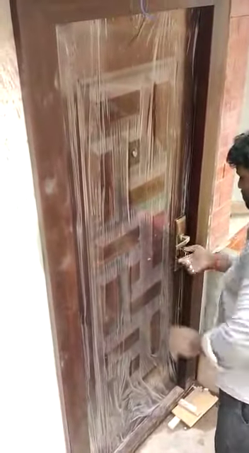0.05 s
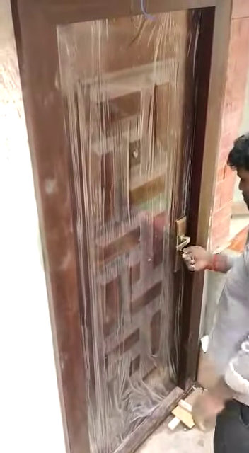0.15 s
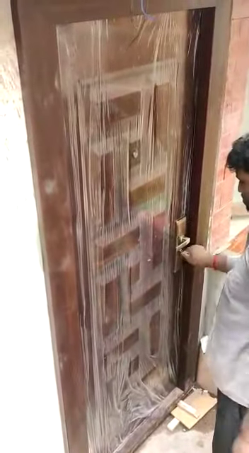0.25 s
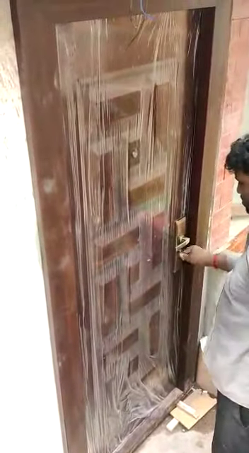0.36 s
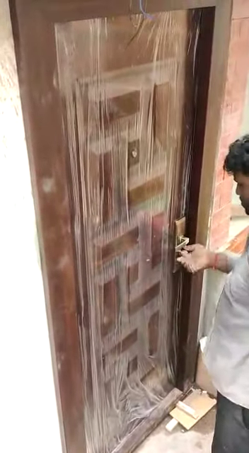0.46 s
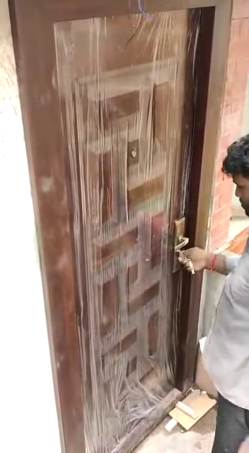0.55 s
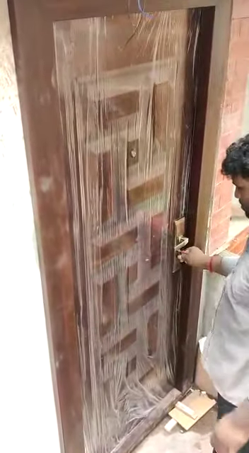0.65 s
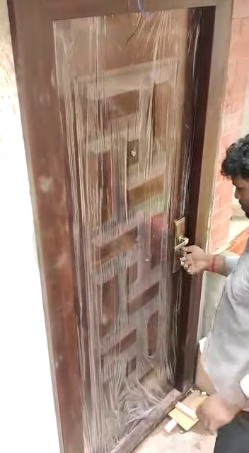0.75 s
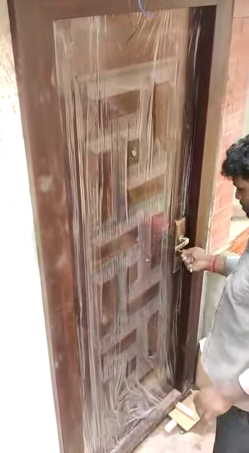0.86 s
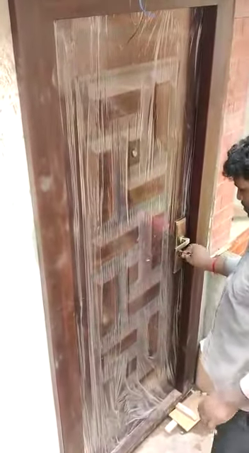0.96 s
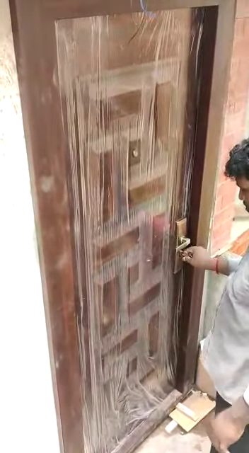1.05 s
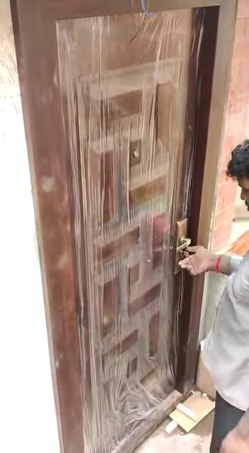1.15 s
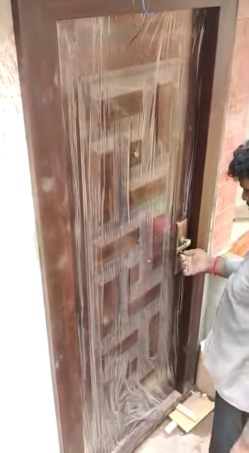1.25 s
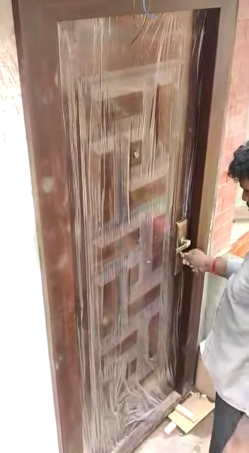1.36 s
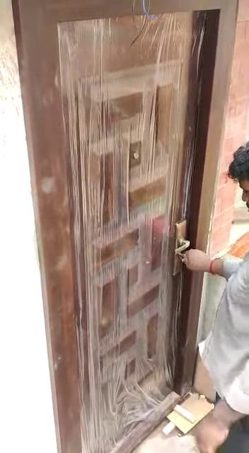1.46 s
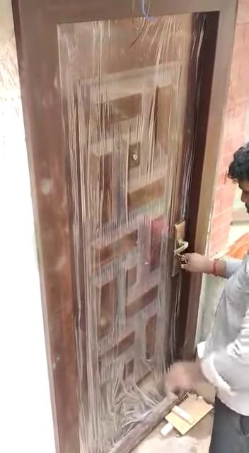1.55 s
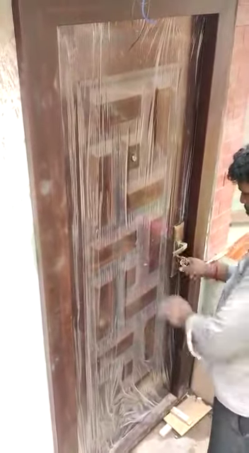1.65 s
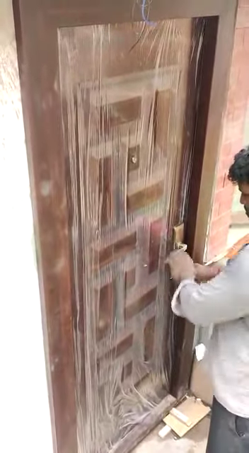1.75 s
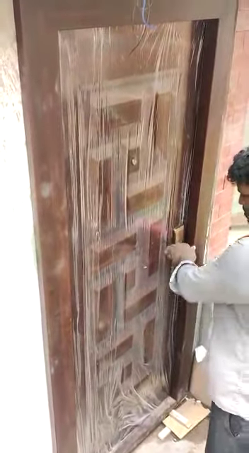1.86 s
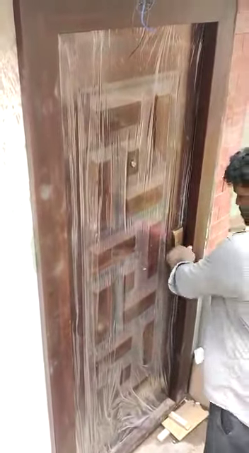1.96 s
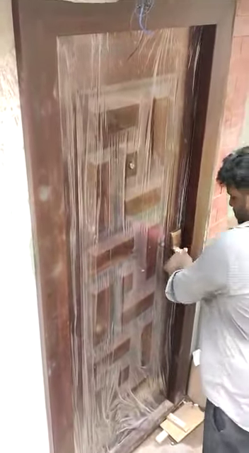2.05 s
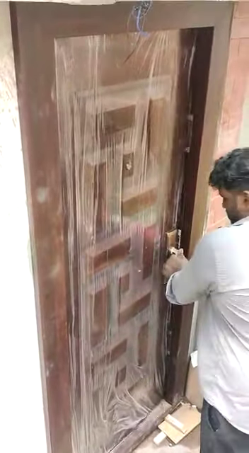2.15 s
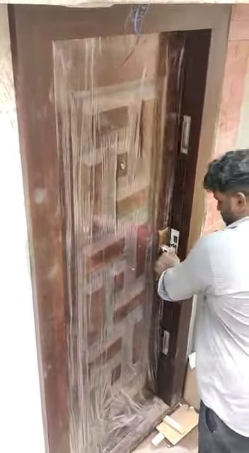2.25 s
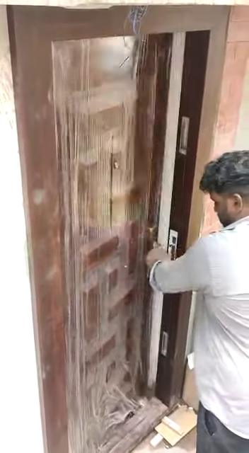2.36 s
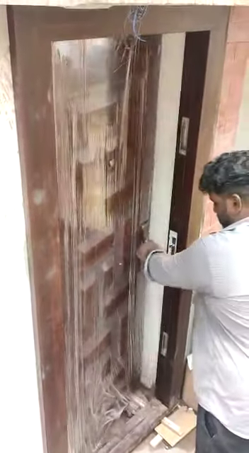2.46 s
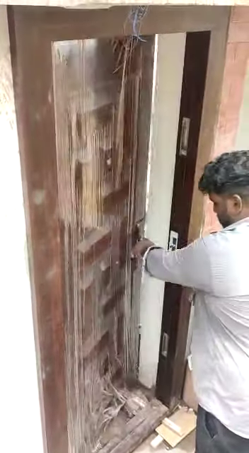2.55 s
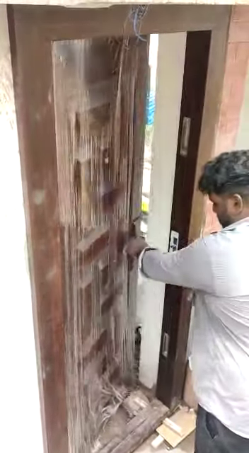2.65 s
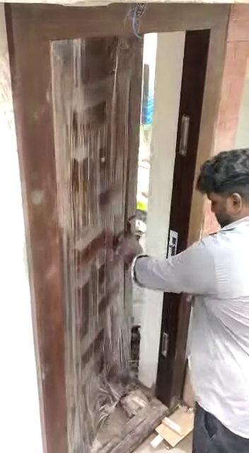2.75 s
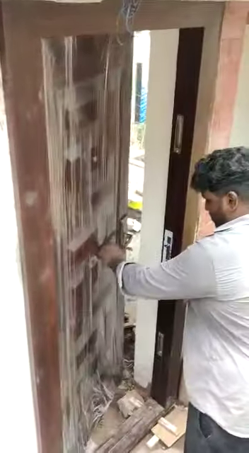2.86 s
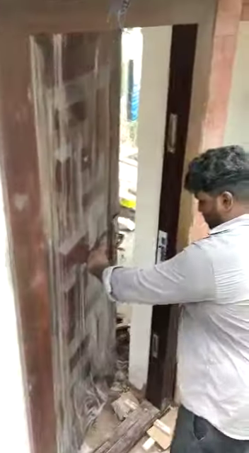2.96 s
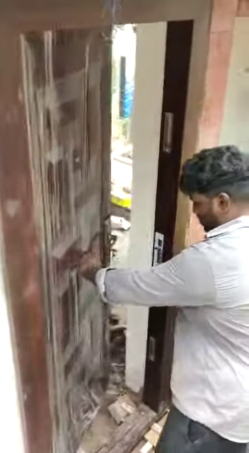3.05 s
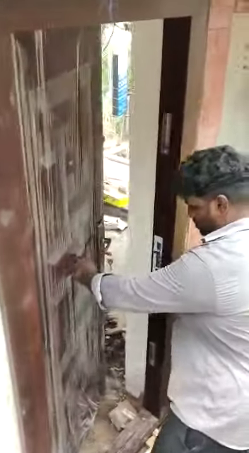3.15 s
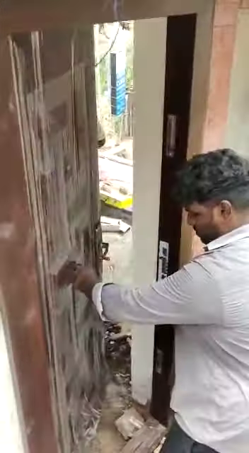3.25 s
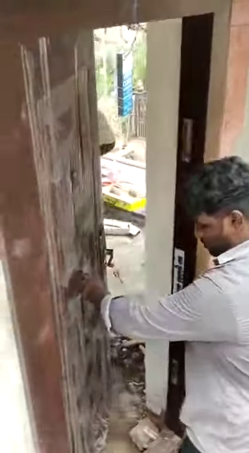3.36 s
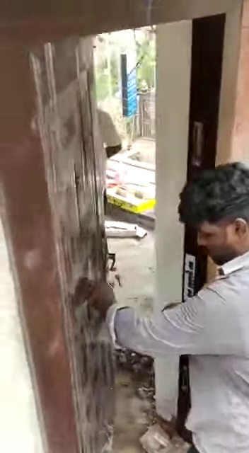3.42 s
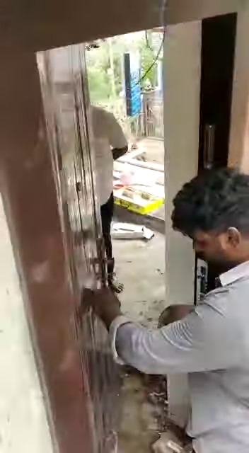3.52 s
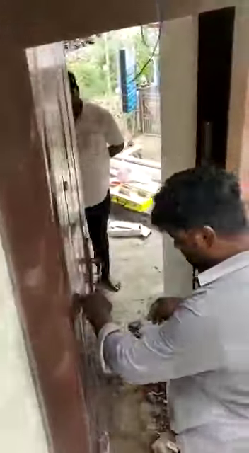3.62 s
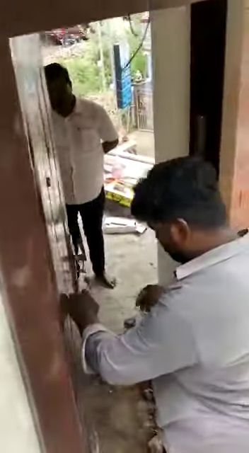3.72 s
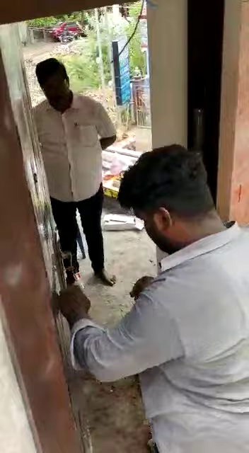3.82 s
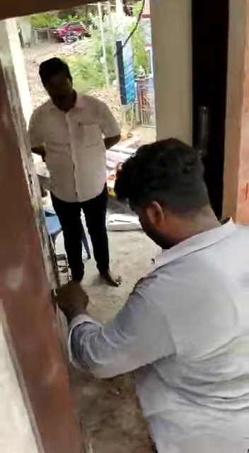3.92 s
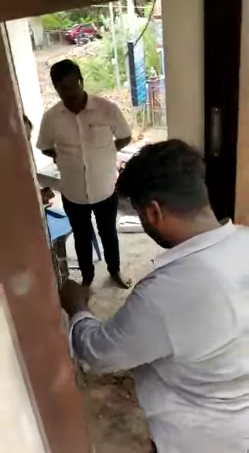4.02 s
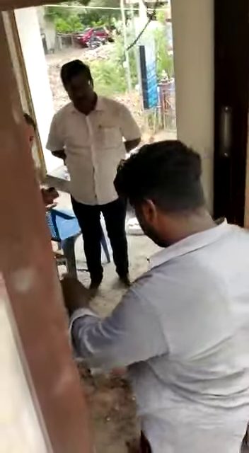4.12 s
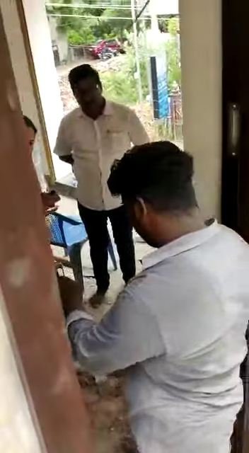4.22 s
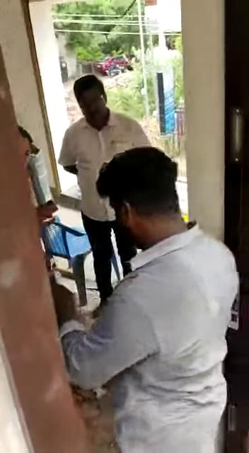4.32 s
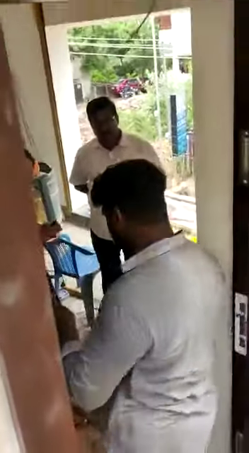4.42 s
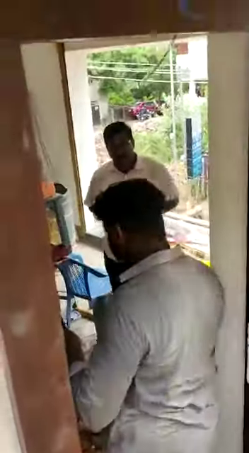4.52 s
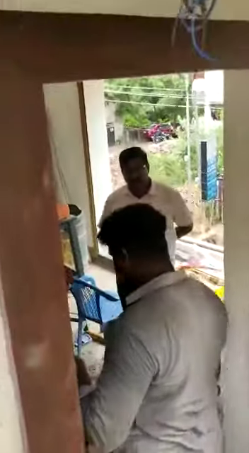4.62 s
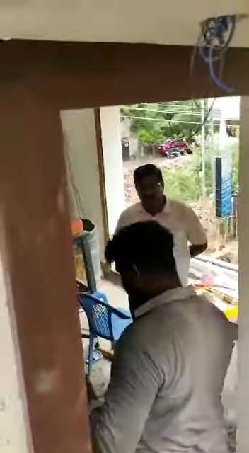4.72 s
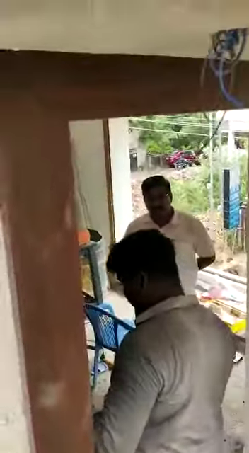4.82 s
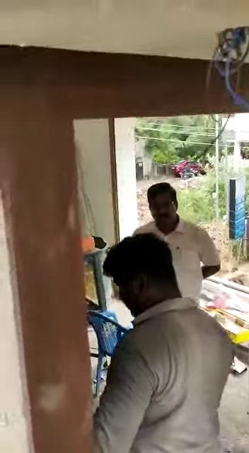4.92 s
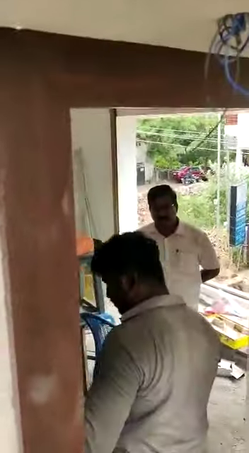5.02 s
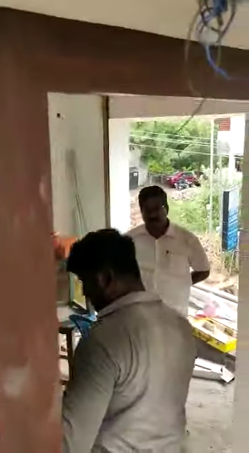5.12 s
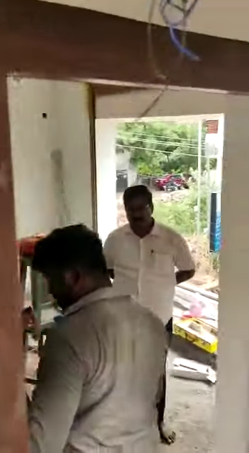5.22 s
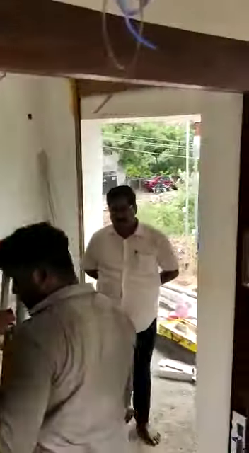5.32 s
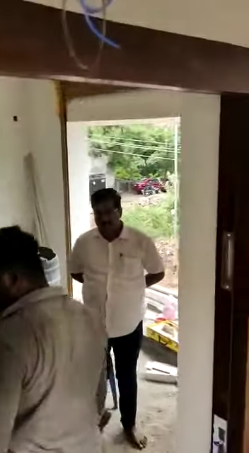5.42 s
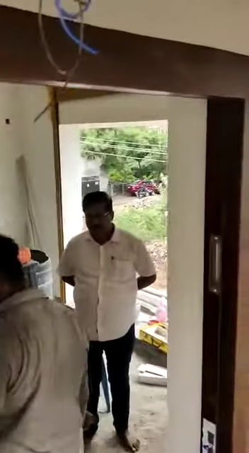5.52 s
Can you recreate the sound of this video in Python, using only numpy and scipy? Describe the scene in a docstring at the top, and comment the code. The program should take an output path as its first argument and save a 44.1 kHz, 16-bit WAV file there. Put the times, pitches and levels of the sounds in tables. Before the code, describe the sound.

Sharp metallic lock clatters over a low outdoor rumble, then a latch click and sudden loud grinder noise with a growing motor hum.

```python
"""A steel door unlocked onto a grinding wheel

A key throws the bolts of a hollow steel door twice, the handle draws the latch and the leaf swings open:
contacts excite decaying noise and the modes of door skin, lock and latch, and bare walls prolong the noise.
Beyond it a motor turns a grinding wheel; strokes of work give a loud rush of shaped noise, ringing steel
modes, sine whines and a hum of multiples that grows as the doorway clears, over a low outdoor rumble."""
import sys
import numpy as np
from scipy import signal
from scipy.io import wavfile

SR = 44100
rng = np.random.default_rng(int(sys.argv[2]) if len(sys.argv) > 2 else 0)


def int16_out(signal):
    """Quantize to a 16-bit WAV file."""
    q = np.round(np.clip(np.atleast_2d(signal).T, -1, 1) * 32767)
    wavfile.write(sys.argv[1], SR, q.astype(np.int16))


N = 246078   # length [samples]

# pressure of the work on the wheel, as level of the rush: (time [s], level [dB])
PRESSURE = [(2.24, -60), (2.282, -45), (2.292, -34.5), (2.39, -28), (2.53, -27), (2.6, -28.5),
            (2.73, -32.5), (2.85, -24), (3.08, -29), (3.19, -23), (3.31, -30), (3.41, -24), (3.64, -32),
            (3.77, -22.5), (3.92, -30.5), (4.04, -23), (4.16, -28), (4.27, -25.5), (4.37, -27.5),
            (4.47, -25), (4.65, -27), (4.8, -26), (4.95, -26.5), (5.05, -25), (5.58, -25.5)]
PRESSURE_PIVOT_DB = -27   # the pressure swing is counted from here
# how each range of the rush answers pressure: (frequency [Hz], share of the swing [1], level [dB])
RUSH_RESPONSE = [(90, 0.092, -2.5), (230, 0.55, -0.5), (545, 1.16, -1), (1820, 1.12, 0), (3080, 0.83, 4.5),
                 (4400, 1.08, 1), (6500, 1, 1), (9500, 0.89, 2), (13000, 1.9, 0.5)]
# spectrum of the rush: (frequency [Hz], relative density [dB per Hz])
RUSH = [(26, -58), (45, -3), (123, -10.5), (421, -3.5), (488, -8.5), (996, -6.5), (2300, -10),
        (2800, -13.5), (3300, -11.5), (3750, -6.5), (4350, -7), (5560, -11), (7470, -16.5), (10000, -18.5),
        (11900, -24.5), (13500, -21.5), (14800, -24), (16000, -65)]
# lower rush against the upper rush, stroke by stroke:
# (time [s], gain near 545 Hz [dB], gain near 1820 Hz [dB])
LOWER_RUSH = [(2.24, 25, 15), (2.3, 2, -3), (2.4, 4, -5), (2.5, 6, -5), (2.6, 2.5, -2.5), (2.68, -2, 2.5),
              (2.87, 2, -3.5), (3.05, 0.5, -1.5), (3.2, -0.5, -2), (3.36, 1.5, -1), (3.5, 1.5, 1),
              (3.62, 5, 2.5), (3.78, 0, -1), (3.92, 6, 3), (4.1, -0.5, -1), (4.27, 5.5, 0.5), (4.5, 2.5, 3),
              (4.75, 2.5, -5.5), (4.93, 3, 0.5), (5.05, 0.5, 2), (5.58, -0.5, 8)]
# rush near 3 kHz against its neighbours: (time [s], level [dB])
HOLLOW = [(2.24, -3), (2.9, 0), (3.3, -1.5), (3.8, -1.5), (4.2, -2), (4.7, -4.5), (5.0, -3), (5.58, 0.5)]
# rush near 230 Hz against its neighbours: (time [s], level [dB])
UNDERTONE = [(2.24, -0.5), (3.0, -1), (3.6, 2), (4.3, 1), (4.8, -1.5), (5.1, -6), (5.3, -9), (5.58, -9)]
# modes of the grinder's frame and the bare room: (frequency [Hz], width [Hz], relative level [dB])
BOOM = [(164.6, 22, -7), (230.5, 14, -3.5), (334, 30, -1), (415, 37, -7), (424.2, 4.7, -2), (468, 16, -5.5),
        (560, 24, -2), (626, 47, -2.5), (725, 13, -4), (935, 53, -6), (990, 460, -15), (2030, 440, -0.5),
        (2320, 125, -1.5)]
# boom near 380 Hz, surging at 3.4 s and fading after 5 s: (time [s], level [dB])
BOOM_SWELL = [(2.24, -9), (3.25, 2), (3.38, 16.5), (3.6, 1), (3.8, 6.5), (4.1, 5), (4.5, 5), (4.95, 2),
              (5.1, -18), (5.58, -12)]
# modes of the ground steel: (frequency [Hz])
RING_HZ = [4230, 4770, 6930, 7410, 11614, 12309]
# the same modes in turn: (width [Hz], radiation [dB])
RING_SHAPE = [(70, 3.5), (150, 1), (90, 3), (151, 1.5), (95, 8.5), (45, 1.5)]
# spells of ringing: (start [s], length [s], relative drive of each of the six modes [dB])
RINGINGS = [(2.34, 0.3, -33, -52, -47, -33, -38.5, -35), (2.82, 0.22, -46, -52, -54, -34.5, -39, -37.5),
            (3.15, 0.18, -33.5, -47, -39, -34, -37, -39), (3.41, 0.18, -43, -54, -44, -33.5, -40, -37),
            (3.75, 0.14, -36, -37, -40, -35, -37.5, -35), (3.97, 0.12, -37, -54, -45, -36, -46, -35),
            (4.19, 0.17, -40, -46, -40, -36, -41.5, -36), (4.41, 0.21, -35, -40, -36, -34, -37.5, -37.5),
            (4.66, 0.16, -37, -30.5, -36.5, -40, -40.5, -38), (4.86, 0.18, -37, -44, -43, -37, -42.5, -40),
            (5.11, 0.11, -44, -51, -53, -53, -48, -52), (5.37, 0.13, -43, -35, -36.5, -47, -43, -44)]
RING_ATTACK_S, RING_RELEASE_S = 0.029, 0.13
RING_IDLE_DB, RING_SHARE = -56, 0.43   # faint steady drive; share of the pressure swing
# the lowest mode locks into a clear whine: (start [s], length [s], pitch [Hz], level [dB])
WHINES = [(2.35, .07, 4235, -34.5), (2.44, 0.094, 4235, -33), (2.52, .035, 4225, -29.5),
          (2.566, 0.031, 4240, -37), (3.09, .06, 4120, -38), (3.186, 0.033, 4220, -29),
          (3.245, 0.079, 4210, -39), (3.34, 0.054, 4190, -32.5)]
WHINE_ATTACK_S, WHINE_RELEASE_S = 0.015, 0.025
TURN_HZ, HUM_DB = 53.35, -29.5   # turning rate; common level of the multiples
# tone at the turning rate: (time [s], relative level [dB])
TURN_LEVEL = [(0.0, -42), (0.39, -31.5), (0.65, -47), (1.46, -36), (1.66, -47), (2.44, -26.5),
              (2.49, -32.5), (5.55, -41.5), (5.58, -50)]
# hum: (multiple of the turning rate [1], relative level [dB], time of full level [s], rise [dB per s])
OVERTONES = [(3, -8, 4.92, 23), (4, -4, 5.66, 30), (5, -15, 5.6, 12), (6, -2.5, 5.37, 60),
             (7, -6.5, 5.07, 30), (8, -9.5, 4.76, 16), (9, -9.5, 5.25, 17), (10, -12, 5.3, 23),
             (10.8, 2, 5.47, 13.5), (12, -13, 5, 14), (14, -9.5, 5.13, 15), (17, -12.5, 5.0, 12),
             (19, -12, 5.3, 15), (19.8, -7, 4.8, 22), (21, -10, 5.3, 17), (22, -10, 6.7, 17),
             (26, -12.5, 4.9, 20)]
# contacts in the lock, levels and decay relative: (time [s], peak at 2-7 kHz [dB], door panel [dB],
# top octave [dB], rattle decay by 60 dB [s])
CONTACTS = [(0.154, -43, -40.5, -65, 0.064), (0.2164, -40, -42, -51, 0.18), (0.222, -48, -32.5, -56, 0.26),
            (0.2354, -41, -44, -46, 0.15), (0.2595, -28, -30, -35, 0.11), (0.272, -23, -27.5, -44, 0.12),
            (0.283, -28, -19.5, -43, 0.1), (0.289, -18.5, -29, -33, 0.12), (0.297, -20, -16.5, -35, 0.15),
            (0.309, -16.5, -37, -37, 0.15), (0.319, -20.5, -20, -35, 0.14), (0.328, -18.5, -23, -42, 0.11),
            (0.338, -26, -40, -47, 0.12), (0.35, -35, -23, -49, 0.11), (0.402, -55, -34, -62, 0.63),
            (0.63, -41, -32, -47, 0.12), (0.644, -38.5, -30.5, -51, 0.16), (0.8847, -47, -39.5, -61, 0.11),
            (0.9142, -39.5, -58, -50, 0.16), (0.9393, -47, -35.5, -58, 0.29), (0.9846, -56, -39, -56, 0.1),
            (1.0795, -48, -48, -53, 0.13), (1.272, -39.5, -36.5, -49, 0.097),
            (1.3354, -42.5, -37.5, -60, 0.22), (1.3807, -32, -32, -44, 0.15), (1.392, -34, -28, -44, 0.13),
            (1.405, -25, -24, -39, 0.16), (1.411, -26, -25, -42, 0.15), (1.423, -22, -31, -42, 0.14),
            (1.4351, -14.5, -21.5, -30.5, 0.12), (1.447, -17, -17.5, -32, 0.16),
            (1.463, -24, -28, -42, 0.12), (1.478, -33, -29.5, -46, 0.12), (1.492, -36, -32, -53, 0.15),
            (1.5274, -50, -37, -56, 0.13), (1.702, -44, -43, -69, 0.076), (1.735, -45, -45, -67, 0.19),
            (1.8498, -50, -40, -60, 0.16), (1.967, -65, -31.5, -55, 0.18), (2.0722, -39.5, -35, -63, 0.65),
            (2.107, -26, -30.5, -39.5, 0.39), (2.1412, -24, -36, -48, 0.089),
            (2.1746, -28, -31, -38.5, 0.14), (2.289, -35, -50, -35, 0.12), (2.3208, -24, -29, -33, 0.16)]
# spectrum of the contact noise: (frequency [Hz], relative density [dB per Hz])
CLACK = [(88, -43), (150, -3), (414, 3), (601, -11.5), (888, -8.5), (1480, -10.5), (3160, -15), (4760, -12),
         (7470, -21), (14800, -20), (16000, -52)]
# modes of the door skin: (frequency [Hz], width [Hz], relative level [dB])
PANEL = [(250, 30, -14), (321, 22, -4.5), (360, 37, 2), (367.4, 9.4, -2.5), (418, 19, 0), (457, 17, 1.5),
         (552, 8.3, -7), (589.7, 8.4, -1.5), (736, 70, -1.5)]
# modes of lock case and bolts: (frequency [Hz], width [Hz], relative level [dB])
LOCK = [(1094, 43, 1), (1440, 15, -5), (1920, 82, 0), (2350, 79, -1), (2560, 21, -3), (3510, 37, -3),
        (3730, 24, -8), (4600, 29, -3.5), (5100, 53, -4), (4670, 64, -3), (5900, 52, -7), (6940, 74, -18),
        (7000, 62, -5.5)]
# the latch tongue snaps back: (time [s], relative peak [dB])
SNAPS = [(2.1072, -30), (2.113, -33), (2.1407, -31), (2.1745, -39), (2.2883, -30), (2.322, -35)]
# modes of the latch's spring plate: (frequency [Hz], width [Hz], relative level [dB])
LATCH = [(2346, 22, 0.5), (3360, 90, 3.5), (4850, 40, -7), (5080, 30, -2), (5520, 80, 2), (6030, 30, -1),
         (6370, 28, -0.5)]
# keys touching on their ring: (time [s], peak level [dB], pitch [Hz])
KEYS = [(0.066, -50, 4450), (0.151, -50, 4370), (0.621, -47, 4460), (0.775, -61, 4400), (1.082, -53, 5940)]
KEY_T60_S = 0.087
# slow flexing of the freed leaf
FLEX_S, FLEX_HZ, FLEX_DB, FLEX_RISE_S, FLEX_T60_S = 2.07, 29.3, -18, 0.039, 0.97
# reverberation between bare walls: (frequency [Hz], decay by 60 dB [s])
ROOM_T60 = [(200, 0.66), (1000, 0.43), (4000, 0.41), (12000, 0.18)]
ROOM_DB = -12.5
# spectrum of the outdoor rumble: (frequency [Hz], relative density [dB per Hz])
AMBIENCE = [(12, -29), (20, -1), (104, -5.5), (134, -11.5), (172, -14.5), (198, -19), (293, -20), (328, 8),
            (434, -64), (485, -26.5), (1030, -35), (2600, -40.5), (5530, -40.5), (9140, -56.5),
            (16000, -48)]
AMBIENCE_DB = -11
# stereo coherence: (frequency [Hz], left-right likeness [1])
LIKENESS = [(60, .98), (200, .95), (390, .87), (560, .72), (680, .4), (1000, .5), (1400, .15), (2400, .05),
            (15000, .02)]
# stereo balance: (frequency [Hz], left minus right [dB])
BALANCE = [(60, 0.5), (240, -1), (950, -1), (3770, -1), (15000, 2)]
LEFT_LAG = 8   # delay of the left channel [samples]
CUTOFF_HZ = 16400   # upper edge of the output low-pass [Hz]


def rush_levels():
    """Friction noise grows with contact pressure, by a different share in each frequency range."""
    swing_db = course(PRESSURE) - PRESSURE_PIVOT_DB
    undertone_db, low_db, middle_db = course(UNDERTONE), course(LOWER_RUSH, 1), course(LOWER_RUSH, 2)
    extra_db = [undertone_db / 2, low_db / 2 + undertone_db, low_db, middle_db, course(HOLLOW), 0, 0, 0, 0]
    return [PRESSURE_PIVOT_DB + share * swing_db + level_db + more_db
            for (_, share, level_db), more_db in zip(RUSH_RESPONSE, extra_db)]


def wheel_power(hz, rush_db, judder_db):
    """Abrasion is broadband noise: its power follows the strokes, a common judder and a flicker per band."""
    stroke_db = blend(hz, np.array(RUSH_RESPONSE)[:, 0], rush_db)
    level_db = at_hz(RUSH, hz) + stroke_db + 16 + judder_db + 1.34 * drift(5.5)
    return gate(PRESSURE) * amp(2 * level_db)


def grinder_boom(rush_db):
    """Forced vibration: noise at the rush's level drives frame and room modes, with a swell near 380 Hz."""
    swell_db, out = course(BOOM_SWELL), 0
    for hz, width_hz, level_db in BOOM:
        nearness = np.exp(-(np.log2(hz / 380) / 0.19) ** 2)   # distance in octaves
        drive_db = blend(hz, [230, 330], rush_db[1:3]) + level_db + swell_db * nearness - 11.0
        out = out + resonate(gate(PRESSURE) * amp(drive_db), hz, width_hz, flicker_db=1.6)
    return out


def ring_drive(column):
    """Excitation of one mode: spells of stronger drive add to a faint steady one."""
    spells = sum(amp(row[column]) * spell(row[0], row[1], RING_ATTACK_S, RING_RELEASE_S) for row in RINGINGS)
    return amp(RING_IDLE_DB) * gate(PRESSURE) + spells


def ringing_steel():
    """Modal radiation: friction noise excites the steel's narrow modes, harder under greater pressure."""
    pressed_db, out = RING_SHARE * (course(PRESSURE) - PRESSURE_PIVOT_DB) - 3.0, 0
    for k, (hz, (width_hz, radiation_db)) in enumerate(zip(RING_HZ, RING_SHAPE)):
        drive = ring_drive(2 + k) * amp(radiation_db + pressed_db)
        out = out + resonate(drive, hz, width_hz, flicker_db=1.5, rate_hz=9.0)
    return out


def whine():
    """Mode locking concentrates the energy in one line: a slightly unsteady sine for each whine."""
    t, out = np.arange(N) / SR, 0
    for start, length, hz, level_db in WHINES:
        phase = 2 * np.pi * hz * t + 1.4 * drift(12.0) + rng.uniform(0, 2 * np.pi, (2, 1))
        level = amp(level_db + 1.4 * drift(19.0)) * spell(start, length, WHINE_ATTACK_S, WHINE_RELEASE_S)
        out = out + level * np.sin(phase)
    return np.sqrt(2) * out


def motor():
    """Rotation radiates its rate and multiples; the multiples swell in as the doorway clears, all waver."""
    t = np.arange(N) / SR
    turns = 2 * np.pi * TURN_HZ * t
    out = amp(course(TURN_LEVEL) - 4.5 + 1.4 * drift(0.39)) * np.sin(turns + 2.0 * drift(1.37))
    for multiple, level_db, full_s, rise_db_per_s in OVERTONES:
        waver = 0.0037 * multiple ** 2 * drift(7.0)   # phase [rad]
        # the pitch is a whole multiple even where the table gives a fraction
        pair = np.sin(round(multiple) * turns + waver + rng.uniform(0, 2 * np.pi, (2, 1)))
        swell_db = HUM_DB - rise_db_per_s * np.maximum(full_s - t, 0)
        flutter_db = 0.8 * drift(3.0) + 0.0067 * multiple ** 2 * drift(14.0)
        out = out + amp(swell_db + level_db + flutter_db) * spread(pair, multiple * TURN_HZ)
    return np.sqrt(2) * out


def lock_levels(touches):
    """Impact noise in three ranges: the higher the range, the faster it builds up and dies."""
    thud = rattles(touches, column=2, stretch=1.6, rise_s=0.015)
    clack = rattles(touches, column=1, stretch=0.82, rise_s=0.0055)
    tick = rattles(touches, column=3, stretch=0.59, rise_s=0.00094)
    return [10 * np.log10(power + 1e-12) for power in (thud * amp(-7), clack, tick * amp(21.0))]


def lock_power(hz, lock_db):
    """Direct contact noise of one band plus its reverberation."""
    return linger(amp(2 * (at_hz(CLACK, hz) + blend(hz, [700, 2500, 9000], lock_db) + 15.5)), hz)


def struck_door(touches):
    """Impulse response of bodies: contacts strike door skin and lock, and snaps strike the latch plate."""
    panel = blows(touches, PANEL, column=2, gain_db=-8.0, scatter_db=2.0, soft_hz=694)
    lock = blows(touches, LOCK, column=1, gain_db=-13.5, scatter_db=1.5, soft_hz=6800)
    latch = blows(np.array(SNAPS), LATCH, column=1, gain_db=-3.5, scatter_db=2.5, soft_hz=9000)
    return panel + lock + latch


def flex():
    """Free damped bending of the leaf: one slow sine that swells and dies."""
    t = np.maximum(np.arange(N) / SR - FLEX_S, 0)
    envelope = amp(FLEX_DB - 60 * t / FLEX_T60_S) * (1 - np.exp(-t / FLEX_RISE_S)) ** 2
    return np.sqrt(2) * envelope * np.sin(2 * np.pi * FLEX_HZ * t)


def keys():
    """Free decay of small metal bodies: each touch is a short, exponentially fading sine."""
    out = np.zeros(N)
    t = np.arange(round(0.1 * SR)) / SR
    for s, level_db, hz in KEYS:
        out[round(s * SR):][:len(t)] += amp(level_db - 60 * t / KEY_T60_S) * np.sin(2 * np.pi * hz * t)
    return out


def outdoor_power(hz):
    """Stationary background noise: a fixed spectrum whose bands drift slowly."""
    return amp(2 * (at_hz(AMBIENCE, hz) + AMBIENCE_DB + 1.13 * drift(3.5)))


def linger(power, hz):
    """Exponential reverberation: bare walls return power that dies with the room's decay time."""
    r = amp(-120 / (at_hz(ROOM_T60, hz) * SR))
    return power + amp(2 * ROOM_DB) * signal.lfilter([0.002], [1, -r], power)


def rattles(rows, column, stretch, rise_s):
    """Power superposition: every contact builds up quickly and its loose parts rattle out."""
    power = np.zeros(N)
    for row in rows:
        t60 = np.clip(row[4], 0.01, 0.6) * stretch
        t = np.arange(round(1.5 * t60 * SR)) / SR
        decay = amp(2 * (row[column] - 60 * t / t60))
        power[round(row[0] * SR):][:len(t)] += decay * (1 - np.exp(-t / rise_s))
    return power


def blows(rows, modes, column, gain_db, scatter_db, soft_hz):
    """Modal impact: each rounded click strikes every mode with a strength and sign of its own."""
    at, peak_db = [round(row[0] * SR) for row in rows], rows[:, column]
    chance, out = rng.standard_normal((len(at), len(modes), 3)), np.zeros((2, N))
    rung_out = max(at) + SR // 4
    for k, (hz, width_hz, level_db) in enumerate(modes):
        strength = amp(peak_db + level_db + gain_db + scatter_db * chance[:, k, 0])
        clicks = np.zeros((2, rung_out))
        clicks[:, at] = strength * np.sign(chance[:, k, 1:].T)
        # the factor undoes the small response of a narrow mode to a click
        out[:, :rung_out] += spread(mode(clicks, hz, width_hz), hz) * SR / (2 * np.pi * width_hz)
    touch = signal.butter(4, soft_hz, fs=SR, output="sos")
    return signal.sosfilt(touch, out + 1e-18)


def resonate(drive, hz, width_hz, flicker_db, rate_hz=3.5):
    """Noise-driven resonance with wandering coupling; unit drive gives about unit rms."""
    start = np.argmax(drive > 0)   # nothing rings before the drive begins
    force = (drive * amp(flicker_db * drift(rate_hz)))[start:] * rng.standard_normal((2, N - start))
    rung = spread(mode(force, hz, width_hz), hz)
    return np.pad(np.sqrt(SR / (np.pi * width_hz)) * rung, ((0, 0), (start, 0)))


def mode(x, hz, width_hz):
    """A damped oscillator, as a two-pole resonance with gain 1 on top."""
    r = np.exp(-np.pi * width_hz / SR)
    feedback = [1, -2 * r * np.cos(2 * np.pi * hz / SR), r * r]
    return signal.lfilter(np.array([1, 0, -1]) * (1 - r * r) / 2, feedback, x + 1e-18)


def bands():
    """Spectral division: narrow bands of noise of equal density, as (centre Hz, left and right)."""
    edges, white = 20 * 2 ** np.arange(0, 10, 0.4), rng.standard_normal((2, 2, N))
    for k, (low, high) in enumerate(zip(edges, edges[1:])):
        hz = np.sqrt(low * high)
        band = signal.butter(2, [low, high], "band", fs=SR, output="sos")
        yield hz, spread(signal.sosfilt(band, white[k % 2]), hz)   # neighbours are unrelated


def spread(pair, hz):
    """Stereo coherence: mixes two signals to be alike in the bass and diffuse in the treble."""
    alike, lean_db = np.clip(at_hz(LIKENESS, hz), -1, 1), at_hz(BALANCE, hz) / 2
    both = np.sqrt(1 + alike) * pair[0] + np.sqrt(1 - alike) * pair[1] * np.array([[1], [-1]])
    return both * amp([[lean_db], [-lean_db]]) / np.sqrt(2)


def blend(hz, anchors_hz, courses_db):
    """Logarithmic interpolation: a band mixes the two level courses that lie nearest."""
    place = np.interp(np.log(hz), np.log(anchors_hz), np.arange(len(anchors_hz)))
    k = min(int(place), len(anchors_hz) - 2)
    return courses_db[k] + (place - k) * (courses_db[k + 1] - courses_db[k])


def at_hz(points, hz):
    """Logarithmic frequency scale: reads a (frequency [Hz], value) table."""
    table = np.array(points)
    return np.interp(np.log(hz), np.log(table[:, 0]), table[:, 1])


def course(rows, column=1):
    """Linear interpolation of one column of a time table, sample by sample."""
    columns = np.transpose(rows)
    return np.interp(np.arange(N) / SR, columns[0], columns[column])


def gate(rows):
    """Gating: open while a time table lasts, with 20 ms ramps."""
    t, s = np.arange(N) / SR, np.transpose(rows)[0]
    return np.clip(np.minimum(t - s[0], s[-1] + 0.02 - t) / 0.02, 0, 1)


def spell(start, length, attack_s, release_s):
    """Raised-cosine envelope: sets in, holds and fades with rounded edges."""
    t = np.arange(N) / SR
    ramp = np.clip(np.minimum((t - start) / attack_s, 1 + (start + length - t) / release_s), 0, 1)
    return np.sin(np.pi / 2 * ramp) ** 2


def drift(rate_hz):
    """Low-passed chance: a slow random course of spread 1, computed at every 40th sample."""
    r = np.exp(-80 * np.pi * rate_hz / SR)
    white = rng.standard_normal(N // 40 + 2002)
    slow = signal.lfilter([1], [1, -2 * r, r * r], white)[2000:]   # drops the filter's start
    return np.interp(np.arange(N) / 40, np.arange(len(slow)), rms_one(slow))


def rms_one(x):
    """Normalization to unit effective value."""
    return x / np.sqrt(np.mean(x ** 2) + 1e-20)


def amp(db):
    """Logarithmic level: decibels to amplitude gain."""
    return np.exp(np.asarray(db) * (np.log(10) / 20))


def scene():
    """Superposition: wheel, lock and outdoors add as power in each band, the other sources as waves."""
    touches = np.array(CONTACTS)
    rush_db, lock_db = rush_levels(), lock_levels(touches)
    judder_db = 0.079 * drift(5.6)
    out = grinder_boom(rush_db) + ringing_steel() + whine() + motor()
    out = out + struck_door(touches) + flex() + keys()
    for hz, noise in bands():
        power = wheel_power(hz, rush_db, judder_db) + lock_power(hz, lock_db) + outdoor_power(hz)
        out = out + noise * np.sqrt(power)
    return out


def record(dry):
    """Path delay, saturation and band limit: left comes later, peaks are rounded, the top is cut."""
    ports = np.array([np.pad(dry[0], (LEFT_LAG, 0), "edge")[:N], dry[1]])
    rounded = 1.384 * np.tanh(ports / 1.04)
    return signal.sosfilt(signal.cheby2(12, 70, CUTOFF_HZ, fs=SR, output="sos"), rounded)


dry = scene()
out = record(dry)
int16_out(out)
```